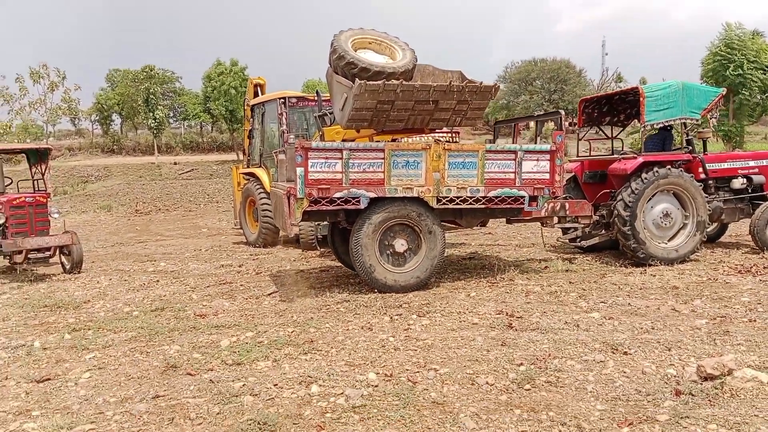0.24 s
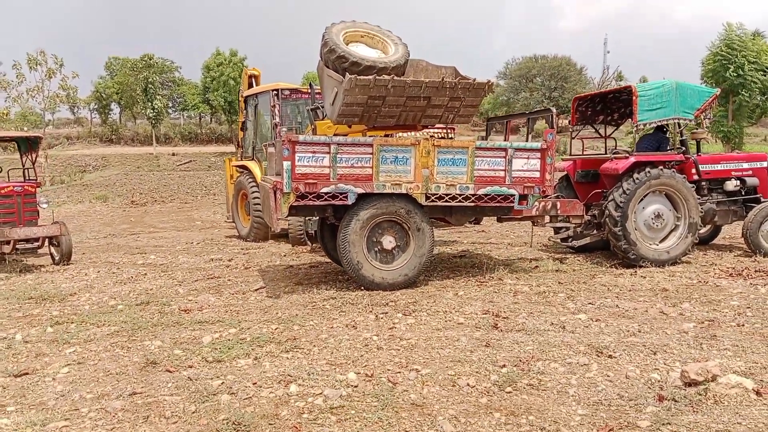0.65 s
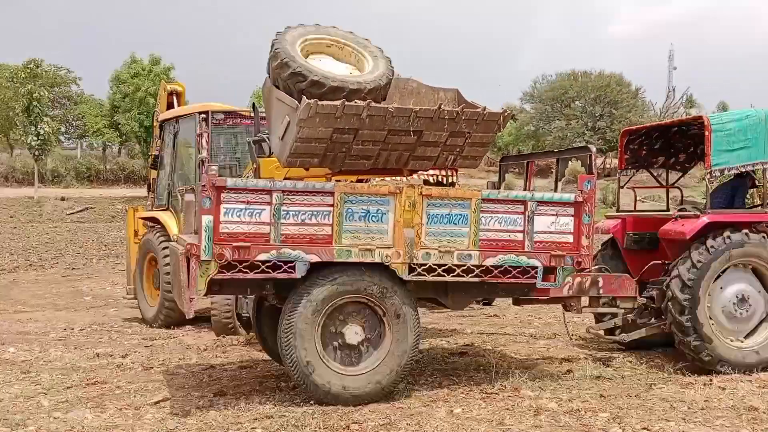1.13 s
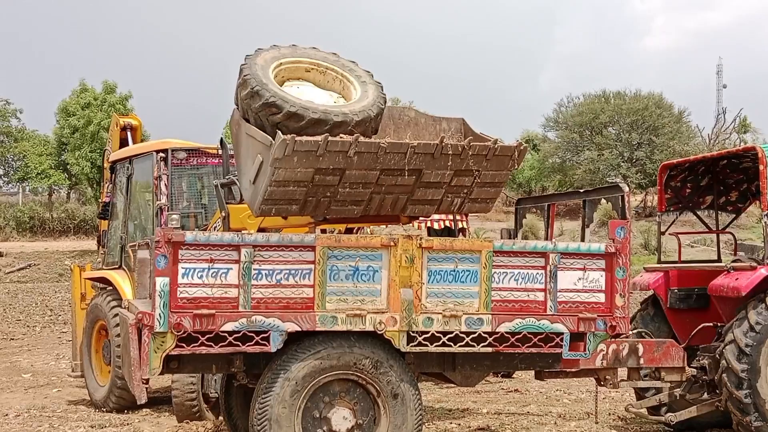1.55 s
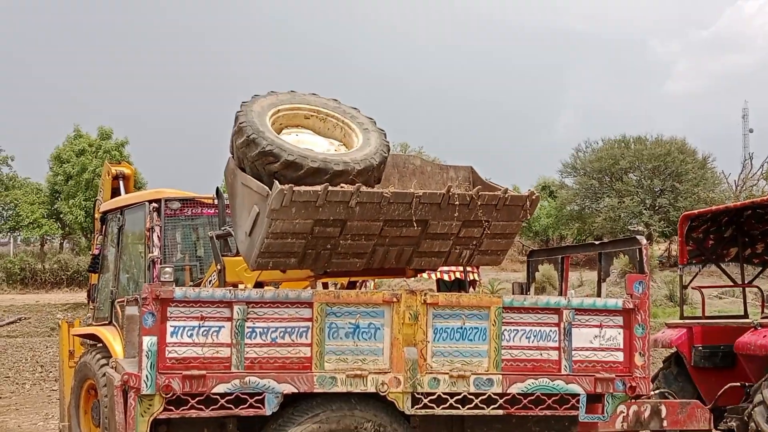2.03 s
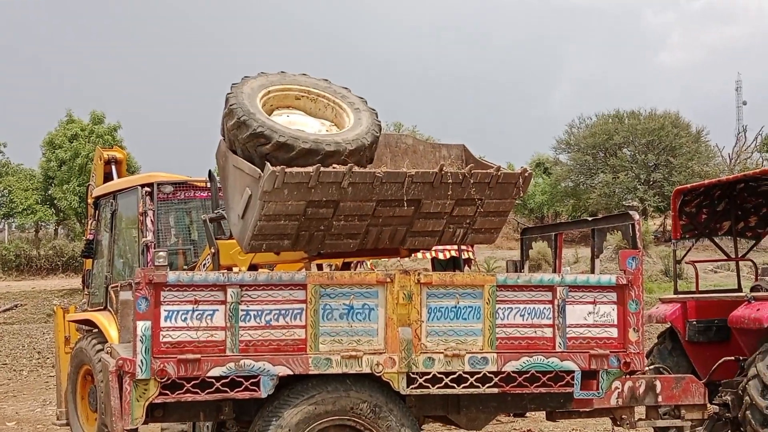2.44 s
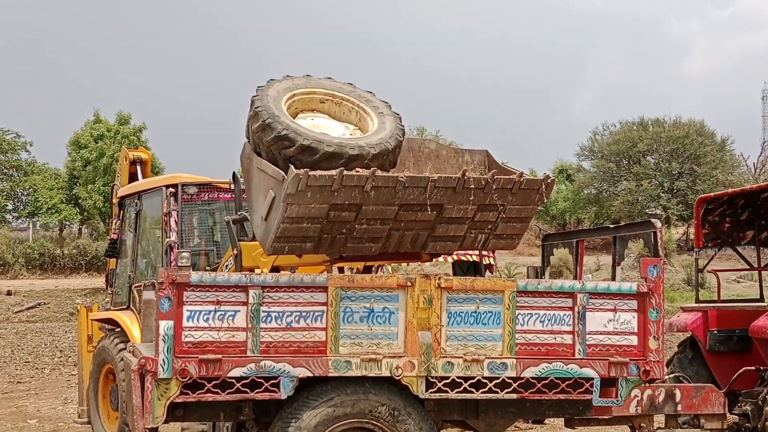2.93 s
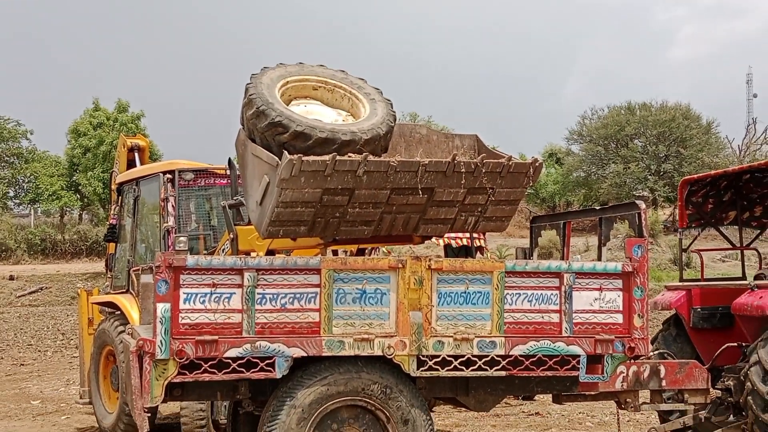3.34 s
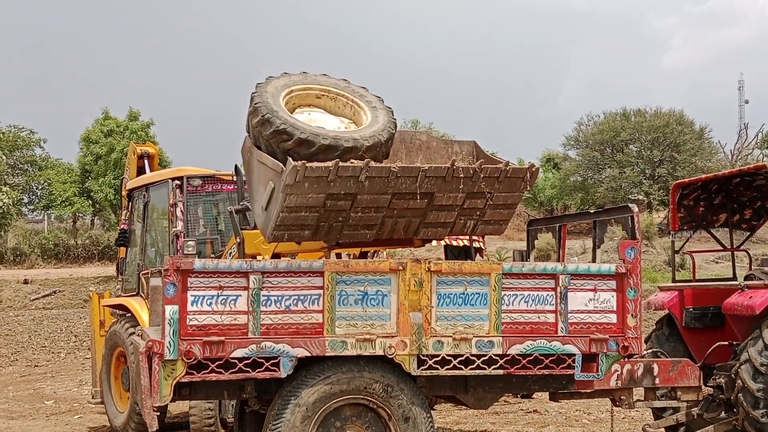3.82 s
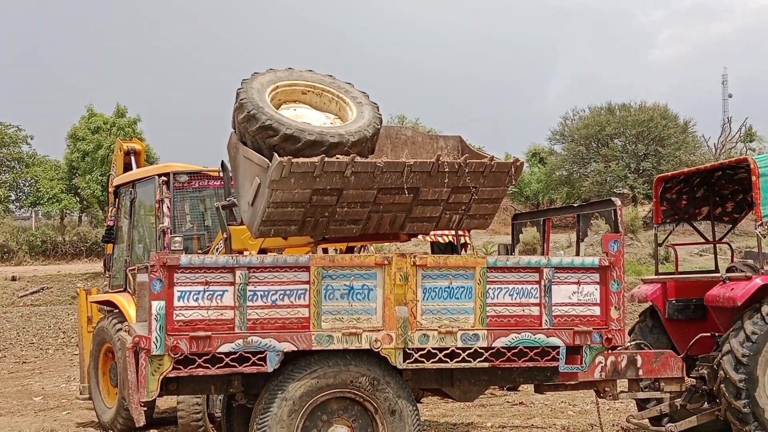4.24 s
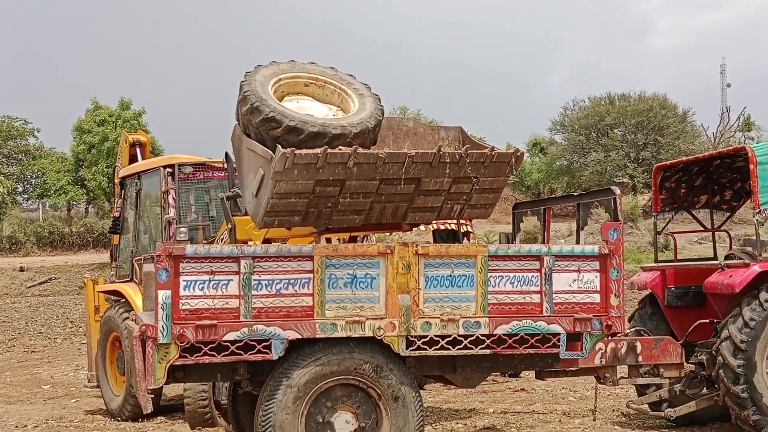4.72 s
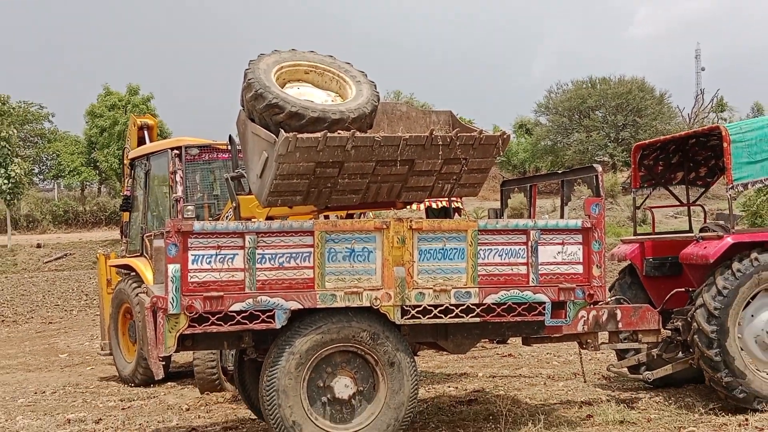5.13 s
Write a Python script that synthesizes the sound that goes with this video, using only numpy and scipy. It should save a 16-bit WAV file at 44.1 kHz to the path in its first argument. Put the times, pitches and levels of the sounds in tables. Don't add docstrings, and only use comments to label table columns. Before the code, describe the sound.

Outdoor phone pickup of a loader engine running at low revs, humming constantly with light knocking that grows fainter. Over it, near the microphone, clods crunch underfoot, dry stalks brush and crack around one second, a gritty double knock comes in the middle, and tiny crisp ticks follow. Small dry squeaks appear early, wind bumps softly, and the top treble is cut off.

```python
import sys
import numpy as np
from scipy import signal
from scipy.io import wavfile
from scipy.ndimage import uniform_filter1d

SR = 44100
rng = np.random.default_rng(int(sys.argv[2]) if len(sys.argv) > 2 else 0)


def undo_db(level):
    steps = np.asarray(level, float) / 20
    return 10 ** steps


def unload_audio(sound):
    columns = np.transpose(np.atleast_2d(sound))
    steps = np.round(np.clip(columns, -1, 1) * 32767)
    wavfile.write(sys.argv[1], SR, steps.astype(np.int16))


N = 237390
T = np.arange(N) / SR

# time in seconds, third order of the firing rate in Hz.
SPEED = [(0, 92.3), (1.55, 92.3), (1.62, 93.15), (2.8, 93.3), (4.25, 93.45), (4.35, 93.0), (4.93, 93.0),
         (4.99, 96.4), (5.2, 96.4), (5.25, 92.4), (5.38, 92.4)]
# time in seconds, level in dB.
HUM_LEVEL = [(0, -36.5), (.1, -42), (.7, -40.5), (.83, -39.5), (1.0, -41.5), (1.12, -39.5), (1.8, -43),
             (2.2, -42), (2.75, -40.5), (2.95, -41.5), (3.25, -39), (4.05, -40), (4.55, -42), (4.8, -50),
             (5.0, -40.5), (5.21, -40), (5.3, -47.5), (5.38, -50)]
# start in seconds, length in seconds, depth in dB.
LULLS = [(.375, 0.0089, 4), (.98, 0.012, 5.5), (1.42, 0.0074, 3), (1.53, 0.0089, 5), (1.67, 0.0099, 3.5),
         (2.19, 0.018, 4.5), (2.44, 0.011, 2.5), (2.9, .01, 6), (3.47, 0.0074, 3), (3.61, 0.012, 4),
         (3.72, 0.0061, 5.5), (4.13, 0.0082, 6.5), (4.23, 0.0036, 6.5), (4.38, 0.037, 4), (5.25, 0.01, 6)]
# multiple of the firing rate, level in dB against the third order.
SIDE_ORDERS = [(.5, -30), (1, -27), (1.5, -31.5), (2.5, -33), (3.5, -16), (4, -40), (4.5, -25), (5, -52.5),
               (5.5, -50), (6, -46)]
LULL_DB_PER_S, SECOND_ORDER_DB, SECOND_LULL_SHARE = 129.5, -11.5, 0.23

# time in seconds, level in dB.
CLATTER_LEVEL = [(0, -42), (.4, -47.5), (.79, -50), (.88, -46), (.97, -50), (1.1, -46.5), (1.29, -49),
                 (1.7, -52), (1.84, -53), (2.4, -55.5), (2.79, -43), (2.92, -59.5), (3.07, -54.5),
                 (3.5, -54.5), (3.82, -61), (4.53, -68.5), (5.14, -54), (5.38, -60.5)]
# frequency in Hz, width in Hz, level in dB.
BLOCK_MODES = [(803, 68, -7), (842.7, 70, -5), (910, 21.4, -5.5), (1024, 57, -8.5)]
# frequency in Hz, width in Hz, level in dB.
HEAD_MODES = [(1321, 46, -5), (1454.6, 55, 1.5), (1662, 84, -1), (1839, 80, -10)]
# frequency in Hz, width in Hz, level in dB.
COVER_MODES = [(2431, 27, 14), (2374, 120, 15), (2710, 77, -2), (3300, 86, -10), (3700, 170, -11)]
# frequency in Hz, width in Hz, level in dB.
PANEL_MODES = [(230, 51, -5), (319, 12, 6), (360, 30, 2)]
# frequency in Hz, width in Hz, level in dB.
DRUM_MODES = [(511.3, 9.3, 0)]
# start in seconds, length in seconds, extra level in dB.
BLOCK_SPELLS = [(.07, 0.097, 6), (.22, 0.09, 5), (.385, 0.036, 7.5), (.53, 0.029, 8), (.72, 0.09, 7),
                (1.0, 0.21, 6.5), (1.39, 0.15, 1.5), (1.7, 0.03, 4.5), (1.84, 0.056, 6), (1.97, 0.029, 1.5),
                (2.1, 0.032, 8), (2.21, 0.051, 5.5), (2.42, 0.02, 9.5), (2.6, 0.045, 1.5), (3.04, 0.16, 3),
                (3.29, 0.072, 5), (3.52, 0.038, 8), (3.66, 0.048, 8), (3.95, 0.13, 9.5), (4.13, 0.06, 8),
                (4.42, 0.021, 12.5), (4.5, 0.17, 16.5), (4.97, 0.06, 4), (5.27, 0.13, 5.5)]
# start in seconds, length in seconds, extra level in dB.
HEAD_SPELLS = [(.06, 0.087, 1.2), (.21, 0.048, 1.8), (.42, 0.16, 2.9), (.66, 0.12, 2.7), (.92, 0.31, 9.1),
               (1.26, 0.14, 5.7), (1.56, 0.087, 5.8), (1.77, 0.1, 4.8), (1.93, 0.25, 5.3),
               (2.2, 0.041, 7.4), (2.35, 0.097, 10.6), (2.57, 0.013, 3.9), (2.9, 0.076, 9.4),
               (3.05, .15, 3.7), (3.37, 0.12, 3.5), (3.5, 0.025, 7.4), (3.69, 0.036, 7.6), (3.8, 0.056, 10),
               (4.13, 0.079, 11), (4.28, 0.023, 15.3), (4.73, 0.053, 7.8), (4.88, 0.038, 5.2),
               (5.17, 0.21, 6.3)]
# start in seconds, length in seconds, extra level in dB.
COVER_SPELLS = [(0, 0.027, 5), (.3, 0.078, 0), (.53, 0.49, 3), (.95, 0.38, 12.5), (1.3, 0.33, 10),
                (1.72, 0.05, 7.5), (1.97, 0.18, 8), (2.22, .08, 6), (2.37, 0.064, 18.5), (2.55, .1, 17),
                (2.7, 0.2, 21.5), (3.14, .04, 11), (4.3, 0.035, 12.5), (5.0, 0.19, 19.5)]
# start in seconds, length in seconds, extra level in dB.
DRUM_SPELLS = [(.47, 0.035, 12), (.87, 0.017, 8.7), (1.12, 0.064, 16.6), (1.25, 0.041, 20.6),
               (1.52, 0.032, 17), (1.58, 0.046, 20), (1.71, 0.017, 13.6), (2.22, 0.023, 16.4),
               (2.76, 0.046, 6.3), (3.33, 0.066, 8), (4.62, 0.055, 6.3), (5.1, 0.013, 8.6)]
BLOCK_DB, HEAD_DB, DRUM_DB, SWELL_DB_PER_S = -5.5, -7, -72.5, 204
COVER_DB, COVER_FADE_DB_PER_S, BUZZ_DB_PER_S = -60.5, 5.5, 78
PANEL_DB, PANEL_FOLLOW = -67.5, 0.067

# frequency in Hz, level in dB per Hz.
FIZZ_SPECTRUM = [(4600, 0), (6200, -10.5), (7600, 0.5), (9300, -8), (10400, -4.5), (11800, -13.5),
                 (13000, -5.5), (15300, -14), (16000, -7.5)]
FIZZ_DB, FIZZ_PULSE = -86, 0.77
FIZZ_LAG = 0.091

# frequency in Hz, level in dB per Hz.
AIR_SPECTRUM = [(290, -29), (500, -9), (641, -44), (896, -0.5), (1200, -2), (1450, -10), (2030, -16.5),
                (2380, -20), (3480, -24.5), (4720, -38.5), (7750, -34.5), (9300, -60.5)]
AIR_DB = -62.5
ECHO_S, ECHO_SWAY, ECHO = .0046, .04, .45

# start in seconds, length in seconds, peak in dB.
GUSTS = [(0, .02, -41.5), (.235, 0.041, -46), (.43, 0.05, -51.5), (.59, 0.015, -48.5), (.69, 0.015, -47.5),
         (.8, 0.047, -50), (1.15, 0.061, -52), (1.32, 0.034, -52), (2.39, 0.1, -54.5), (2.72, 0.12, -54.5),
         (3.17, 0.13, -51.5), (3.655, 0.033, -49.5), (3.78, 0.089, -51.5), (3.99, 0.025, -48.5),
         (4.3, 0.034, -67.5), (4.86, 0.016, -66), (5.02, 0.014, -48.5), (5.14, 0.016, -41),
         (5.215, 0.012, -54.5)]
# frequency in Hz, level in dB per Hz.
RUMBLE_SPECTRUM = [(12, -42), (32, -34.5), (42, -2), (86, 6.5), (108, 1.5), (123, -12.5), (435, -16.5),
                   (700, -29), (910, -53)]
RUMBLE_DB, CALM_DB, GUST_RISE_DB_PER_S, GUST_FALL_DB_PER_S = -58, -61, 327.5, 254.5
PORT_HZ, PORT_HZ_PER_DB = 135, 1.96

# start in seconds, frequency in Hz,
# level in dB, length in seconds.
RINGS = [(.001, 212, -44.5, 0.043), (0.047, 2060, -66, 0.22), (0.224, 163, -33, 0.025),
         (0.212, 322, -45, 0.037), (.42, 146.7, -40.5, 0.037), (5.081, 320.8, -47, 0.054),
         (5.128, 258.4, -47.5, 0.04), (5.137, 411, -47, 0.027), (0.802, 1006, -26, 0.011),
         (0.802, 3020, -42, 0.018), (0.807, 2530, -43.5, 0.035), (0.821, 814, -39, 0.016),
         (0.833, 943, -42.5, 0.058), (0.84, 1450, -41, 0.012), (1.571, 3150, -59, .015),
         (1.573, 6560, -60, 0.058), (1.587, 7350, -66, 0.045), (1.604, 8200, -68, 0.047),
         (2.335, 3430, -53, 0.018), (2.367, 3320, -55, 0.019), (2.359, 6720, -60.5, 0.018),
         (2.413, 2493, -50, 0.03), (2.4, 5700, -76, 0.03), (2.413, 8850, -94, 0.031),
         (2.444, 665, -57, 0.025), (2.659, 1480, -30.5, 0.0076), (2.66, 6620, -42.5, 0.0095),
         (2.661, 3070, -37.5, 0.0093), (2.663, 933, -40, 0.03), (2.669, 2520, -39.5, 0.019),
         (2.715, 910, -39, 0.044), (2.703, 643, -42, 0.046), (2.77, 3320, -49.5, 0.018),
         (2.771, 4460, -67, 0.021), (2.784, 970, -46, 0.011), (2.775, 1385, -49.5, 0.054),
         (2.792, 717, -52, 0.057), (2.846, 6720, -67, 0.02), (3.318, 4040, -73, 0.019),
         (3.32, 8400, -77, .03), (3.342, 6700, -86, 0.081), (3.522, 3450, -67, 0.021),
         (5.081, 2200, -52.5, 0.021), (5.087, 1830, -47, 0.013), (5.083, 785, -49.5, 0.066),
         (5.108, 1156, -48.5, 0.041), (5.165, 9900, -81, 0.0098), (2.66, 4440, -62, 0.02),
         (2.711, 4650, -53, 0.012), (5.358, 4000, -80, .02)]
RING_WIDTH_HZ, RING_RISE_S = 20.7, 0.0073

# start in seconds, level in dB, then thud, grit and dust in dB against it.
CRUNCHES = [(.002, -43, -20, -37, -51), (0.214, -41.5, -9.5, -52, -67), (0.429, -43, -15, -25, -28),
            (0.776, -41, -18, -22, -32), (.804, -30.5, -8, -17, -13), (0.845, -45, -3, -28, -44),
            (2.332, -57, -27, 2.5, 1.5), (2.362, -54, -12, 1.5, -10), (2.452, -50.5, -14, -48, -36),
            (2.657, -40, -25, -5.5, -10.5), (2.709, -38, -5.5, -3, -4), (2.772, -46.5, -6, -8.5, -4),
            (2.826, -49.5, -11, -32, -22), (5.078, -50.5, -8, -9, -21), (5.114, -57, -3, -38, -60.5)]
HOLLOWS_HZ = [630, 910, 1130, 1480, 2510, 3000, 3350, 6650, 7700, 8600, 10100]
CRUNCH_T60_S = 0.23

# start in seconds, level in dB, frequency in Hz, length in seconds,
# upper ring in dB.
CHIRPS = [
    (0.039, -51.5, 3386, 0.034, -64.5),
    (0.425, -50.5, 3390, 0.032, -72),
    (0.864, -46, 3390, 0.026, -66),
]
CHIRP_RING_HZ = 5190
# time in seconds, frequency in Hz, level in dB, octave in dB.
SQUEAL = [(.12, 3665, -82, -100), (.168, 3680, -68, -100), (.188, 3685, -73, -95), (.208, 3645, -61, -90.5),
          (.24, 3685, -66, -78), (.295, 3605, -65, -74), (.345, 3610, -70, -82), (.362, 3610, -88, -102)]

# start in seconds, length in seconds, level in dB,
# share of the low treble from 0 to 1.
BRUSHES = [(0.345, 0.0053, -64, 0.8), (0.78, 0.037, -62, 0.64), (0.876, .04, -81, 0.8),
           (0.9, 0.017, -62.5, 0), (0.945, 0.19, -57.5, 0.6), (1.002, 0.089, -49.5, 0.35),
           (1.101, 0.065, -51, .4), (1.177, 0.055, -51, 0.5), (1.26, 0.032, -48.5, 0.43),
           (1.306, 0.017, -64, 0.4), (1.514, 0.032, -63.5, 1), (1.526, 0.065, -59.5, 0.08),
           (1.588, 0.029, -49.5, 0.15), (1.613, 0.041, -68, 0.3), (2.406, 0.013, -61, 0),
           (2.416, 0.036, -69.5, 0.7), (2.683, 0.14, -72, 0.84), (3.314, 0.092, -78.5, 0.7),
           (3.372, 0.033, -74, 0.5), (3.476, 0.0062, -55, 0.2), (3.503, 0.017, -53, 0.3),
           (4.14, 0.048, -77, 1), (4.218, 0.04, -67, 0.2), (4.263, 0.01, -45, 0.33),
           (5.076, 0.009, -70, 0.7), (5.1, 0.013, -70, 0.2), (5.25, 0.012, -75, 0.2),
           (5.294, 0.0086, -56, 0.24)]
# frequency in Hz, level in dB per Hz.
STALK_SPECTRUM = [(1590, -22.5), (2700, -5), (3870, 0.5), (4810, -28), (6300, -3.5), (8500, 3.5),
                  (10300, 1), (16200, -25)]
STILL_DB, STILL_FADE_DB_PER_S, STILL_SHARE = -82.5, 3, 0.93
BRUSH_RISE_DB_PER_S, BRUSH_FALL_DB_PER_S = 2600, 2397
BRUSH_SWELL_SHARE, BRUSH_TAIL_SHARE = 0.18, 0.35

# start in seconds, peak in dB, ring in Hz, knock in dB, knock in Hz.
SNAPS = [(1.036, -44, 11450, -70, 1870), (1.182, -21.5, 10330, -33, 2200), (1.1873, -16, 7730, -27, 2620),
         (1.1974, -39.5, 10500, -37, 2360), (1.2182, -40, 9900, -44.5, 2400),
         (1.2454, -26.5, 7030, -41, 2310), (1.2787, -36, 10000, -48, 2380), (1.292, -38, 7900, -53, 2430),
         (1.576, -41, 6940, -62, 3050), (2.406, -35.5, 12450, -57, 2330), (3.505, -37, 6030, -30.5, 4010),
         (3.5163, -37, 11940, -44, 3700), (4.248, -51, 13440, -44.5, 2280),
         (4.2617, -25, 12800, -25.5, 2100), (4.2644, -43, 7100, -36, 3660), (4.2705, -50, 8150, -45, 2180),
         (4.2737, -40, 12800, -49, 2300), (5.1, -29.5, 12200, -57, 2200)]
# start in seconds, peak in dB, ring in Hz.
TICKS = [(1.272, -45, 7530), (1.3142, -44, 11300), (1.3757, -56, 10100), (1.5258, -45, 8120),
         (1.5387, -47.5, 10100), (1.5616, -46, 10550), (1.8407, -51.5, 10230), (3.3808, -27, 10900),
         (3.4001, -66, 7060), (3.477, -32, 13500), (3.484, -34, 13100), (4.1426, -31.5, 8400),
         (4.16, -41, 7300), (4.1807, -43, 7640), (4.216, -41, 11900), (4.2294, -34, 13100),
         (4.2335, -33.5, 12300), (4.2914, -61, 13600), (4.1495, -61, 12900), (4.316, -58, 12900),
         (1.1854, -23, 12100), (1.2555, -47.5, 13500), (1.2778, -39, 13270), (1.2435, -35, 10800),
         (1.581, -39, 11170), (3.4465, -67, 12740), (3.4845, -41, 6500), (3.5055, -33.5, 10450),
         (3.5185, -41, 8500), (4.163, -54, 10800), (4.1775, -54, 11000), (4.206, -59, 13000),
         (4.243, -53, 13600), (4.286, -67, 12700), (5.082, -54, 10530), (5.158, -60, 9000),
         (5.168, -60, 12350), (5.27, -57, 14900), (5.293, -44.5, 12700), (5.252, -58, 11800),
         (5.299, -35.5, 5880), (5.309, -55, 13500)]
TICK_KNOCK_DB, TICK_KNOCK_HZ, SNAP_T60_S, STOUT_T60_S = -34, 2200, 0.0035, 0.0029


def evened(x):
    return x / np.sqrt(np.mean(x ** 2) + 1e-20)


def curves(rows, t=T):
    s, *columns = np.transpose(rows)
    return [np.interp(t, s, c) for c in columns]


def add(mix, s, sound):
    part = mix[round(s * SR):][:len(sound)]
    part += sound[:len(part)]


def band(x, lo_hz, hi_hz, order=3):
    edges = [lo_hz, min(hi_hz, SR / 2.1)]
    return signal.sosfilt(signal.butter(order, edges, "band", fs=SR, output="sos"), x)


def resonate(x, hz, width):
    b, a = signal.iirpeak(hz, hz / width, SR)
    return signal.lfilter(b, a, signal.lfilter(b, a, x))


def glide(x, hz, width):
    turn = np.exp(2j * np.pi * np.cumsum(hz) / SR)
    r = np.exp(-np.pi * width / SR)
    return (turn * signal.lfilter([1], np.convolve([1, -r], [1, -r]), x / turn)).real


def wander(seconds):
    size = max(round(seconds * SR), 1)
    return evened(uniform_filter1d(uniform_filter1d(rng.standard_normal(N), size), size))


def shaped(spectrum, patchy_db, size=512, streak_db=0.):
    frames, hz = 4 * N // size + 5, np.fft.rfftfreq(size, 1 / SR)
    a, b, patches, streaks = rng.standard_normal((frames, len(hz), 4)).T
    patches = evened(uniform_filter1d(uniform_filter1d(patches, size=8, axis=0), size=10, axis=1))
    streaks = evened(uniform_filter1d(uniform_filter1d(streaks, size=2, axis=0), size=14, axis=1))
    f, db = np.transpose(spectrum)
    colour_db = np.interp(np.log(hz + 1), np.log(f + 1), db, left=-100, right=-100)
    level_db = colour_db[:, None] + patchy_db * patches + streak_db * np.clip(streaks - 1, 0, 1.5)
    z = (a + 1j * b) * undo_db(level_db)
    return evened(signal.istft(z, nperseg=size, noverlap=3 * size // 4)[1][:N])


def spells(rows, rest_db, rise, fall):
    t = T[::16]
    s, length, db = np.transpose(rows)[:3, :, None]
    shapes = db - rise * np.maximum(s - t, 0) - fall * np.maximum(t - s - length, 0)
    shapes = np.vstack([shapes, (rest_db + 0 * T)[::16]])
    return np.interp(T, t, shapes.max(0)), np.repeat(shapes.argmax(0), 16)[:N]


def firings():
    return np.cumsum(curves(SPEED)[0]) / SR / 3


def exhaust(turns):
    lull_db = spells(LULLS, 0, LULL_DB_PER_S, LULL_DB_PER_S)[0]
    third_db = curves(HUM_LEVEL)[0] + 1 - lull_db
    second_db = third_db + SECOND_ORDER_DB + (1 - SECOND_LULL_SHARE) * lull_db
    flutter, sway = wander(.012), wander(.06)
    hum = undo_db(third_db + 1.1 * flutter + .7 * sway) * np.cos(2 * np.pi * 3 * turns + .22 * sway)
    hum += undo_db(second_db + 1.1 * flutter + 1.1 * sway) * np.cos(2 * np.pi * 2 * turns + 1 + .15 * sway)
    for order, db in SIDE_ORDERS:
        level = undo_db(third_db + db + 0.28 * wander(0.11))
        hum += level * np.cos(2 * np.pi * order * turns + wander(0.59))
    return np.sqrt(2) * hum


def knocks(turns):
    chance_db = 2.0 * np.clip(rng.standard_normal(400), -2, 2)
    cylinder_db = chance_db[turns.astype(int)] - 3.0 * (turns // 1 % 2)
    puff = undo_db(cylinder_db) * 1.1 * np.exp(-(turns % 1) / .3)
    return (.8 + puff) * rng.standard_normal(N)


def clatter(turns):
    knock = knocks(turns)
    base_db = curves(CLATTER_LEVEL)[0]
    block_db = base_db + BLOCK_DB + spells(BLOCK_SPELLS, 0, SWELL_DB_PER_S, SWELL_DB_PER_S)[0]
    head_db = base_db + HEAD_DB + spells(HEAD_SPELLS, 0, SWELL_DB_PER_S, SWELL_DB_PER_S)[0]
    buzz_db = spells(COVER_SPELLS, 0, BUZZ_DB_PER_S, BUZZ_DB_PER_S)[0]
    cover_db = COVER_DB - COVER_FADE_DB_PER_S * T + buzz_db
    panel_db = PANEL_DB + PANEL_FOLLOW * (base_db - base_db.mean())
    drum_db = DRUM_DB + spells(DRUM_SPELLS, 0, 4 * SWELL_DB_PER_S, 4 * SWELL_DB_PER_S)[0]
    parts = ((BLOCK_MODES, block_db), (HEAD_MODES, head_db), (COVER_MODES, cover_db),
             (PANEL_MODES, panel_db), (DRUM_MODES, drum_db))
    out = np.zeros(N)
    for modes, level_db in parts:
        ring = np.zeros(N)
        for k, (hz, width, db) in enumerate(modes):
            waver = 1 + .01 * wander(.09)
            fade_db = 1.5 * np.clip(wander(0.06), -2, 1.6)
            sign = (-1) ** k
            ring += sign * undo_db(db + fade_db) * evened(glide(knock, hz * waver, 1.92 * width))
        out += undo_db(level_db) * evened(ring)
    return out


def fizz(turns):
    since = (turns - FIZZ_LAG) % 1
    pulse = evened(since * np.exp(-since / 0.072)) * undo_db(2.0 * wander(.03))
    hiss = shaped(FIZZ_SPECTRUM, patchy_db=2.5, size=256, streak_db=7)
    return undo_db(FIZZ_DB) * evened(hiss * (1 + FIZZ_PULSE * pulse))


def field_air(turns):
    throb = 1 + 0.072 * np.cos(2 * np.pi * (turns - 2 * FIZZ_LAG))
    return undo_db(AIR_DB + 2.5) * shaped(AIR_SPECTRUM, patchy_db=2.5, streak_db=9.5) * throb


def ground(x):
    lag = ECHO_S * (1 + ECHO_SWAY * wander(.15)) * SR
    echo = np.interp(np.arange(N) - lag, np.arange(N), x)
    return (x + ECHO * echo) / np.sqrt(1 + ECHO ** 2)


def suppress(x, over_db, depth_db):
    z = signal.stft(x, nperseg=1024, noverlap=768)[2]
    power = uniform_filter1d(uniform_filter1d(abs(z) ** 2, size=5, axis=-1), size=3, axis=-2)
    level_db = 10 * np.log10(power + 1e-20)
    usual_db = uniform_filter1d(level_db, size=60, axis=-1)
    shut = np.clip(.5 - (level_db - usual_db) / over_db, 0, 1)
    return signal.istft(z * undo_db(-depth_db * shut), nperseg=1024, noverlap=768)[1][..., :N]


def wind():
    rest_db = CALM_DB + 2.0 * wander(0.009)
    level_db = spells(GUSTS, rest_db, GUST_RISE_DB_PER_S, GUST_FALL_DB_PER_S)[0]
    hz = PORT_HZ + PORT_HZ_PER_DB * np.maximum(level_db - CALM_DB - 7.0, 0)
    turn = np.exp(2j * np.pi * np.cumsum(hz) / SR)
    a, b = signal.sosfilt(signal.butter(2, 45, fs=SR, output="sos"), rng.standard_normal((2, N)))
    thumps = evened(((a + 1j * b) * turn).real)
    return undo_db(level_db) * thumps + undo_db(RUMBLE_DB) * shaped(RUMBLE_SPECTRUM, patchy_db=1.0, size=2048)


def rings():
    out, t = np.zeros(N), T[:SR // 4]
    slow = signal.butter(4, 140, fs=SR, output="sos")
    for s, hz, db, length in RINGS:
        drift, flutter = signal.sosfilt(slow, rng.standard_normal((2, len(t))))
        wavering_hz = hz + (RING_WIDTH_HZ + 0.016 * hz) * evened(drift)
        tone = np.sqrt(2) * np.sin(2 * np.pi * np.cumsum(wavering_hz) / SR)
        level_db = db + 3.42 * evened(flutter) - 5.9 * (t / length) ** 2
        rise = np.minimum(t / (RING_RISE_S + 2 / hz), 1)
        add(out, s, tone * undo_db(level_db) * rise)
    return out


def crunches():
    out, t = np.zeros(N), T[:SR // 4]
    for s, mid_db, *others_db in CRUNCHES:
        low_db, presence_db, treble_db = mid_db + np.array(others_db)
        # level in dB, low edge in Hz, high edge in Hz, speed of decay, rise in seconds.
        bands = ((low_db, 190, 760, .7, .012),
                 (mid_db, 750, 1900, 1, .004),
                 (presence_db, 2000, 4000, 1.2, .003),
                 (treble_db, 5800, 9000, 1.6, .005),
                 (treble_db - 8.5, 9600, 12000, 2.3, .005),
                 (treble_db - 18, 12000, 15400, 3.2, .005))
        for db, lo, hi, quick, rise in bands:
            noise, grit = rng.standard_normal((2, len(t)))
            hollows = sum(evened(resonate(noise, hz, 60 + 0.03 * hz)) for hz in HOLLOWS_HZ if lo < hz < hi)
            sound = evened(0.9 * hollows + evened(band(noise, lo, hi, order=4)))
            sound = sound * undo_db(2.0 * evened(uniform_filter1d(grit, size=200)))
            decay_db = -60 * t * quick / CRUNCH_T60_S
            add(out, s, sound * undo_db(db + decay_db) * np.minimum(t / rise, 1))
    return out


def linkage():
    out = np.zeros(N)
    for s, db, hz, length, ring_db in CHIRPS:
        t = T[:round(2 * length * SR)]
        shake = 1 + 0.66 * np.cos(2 * np.pi * 65 * t)
        chirp = undo_db(db - 21 * (t / length) ** 2) * np.sin(2 * np.pi * hz * t)
        ring = undo_db(ring_db - 9 * t / length) * np.sin(2 * np.pi * CHIRP_RING_HZ * t) * shake
        add(out, s, (chirp + ring) * signal.windows.tukey(len(t), .12))
    hz, db, octave_db = curves(SQUEAL)
    turn = 2 * np.pi * np.cumsum(hz + 10 * wander(0.013)) / SR
    on = uniform_filter1d(1. * (T > SQUEAL[0][0]) * (T < SQUEAL[-1][0]), size=600)
    squeal = undo_db(db) * np.sin(turn) + undo_db(octave_db) * np.sin(2 * turn)
    return out + on * np.sqrt(2) * undo_db(2.5 * wander(.008)) * squeal


def rustle():
    cracks = undo_db(1.9 * rng.exponential(1, N)) * (rng.random(N) < 500 / SR)
    grain = signal.lfilter([1], [1, -.96], cracks)
    hiss = evened(shaped(STALK_SPECTRUM, patchy_db=3.0, streak_db=8) * (1 + .45 * evened(grain)))
    length = np.array(BRUSHES)[:, 1:2]
    rise = 1 / (1 / BRUSH_RISE_DB_PER_S + BRUSH_SWELL_SHARE * length / 30)
    fall = 1 / (1 / BRUSH_FALL_DB_PER_S + BRUSH_TAIL_SHARE * length / 30)
    level_db, row = spells(BRUSHES, STILL_DB - STILL_FADE_DB_PER_S * T, rise, fall)
    shares = np.array([r[3] for r in BRUSHES] + [STILL_SHARE])
    share = np.clip(uniform_filter1d(shares[row], size=1300), 0, 1)
    dull = band(hiss, 2570, 10500, order=2)
    crisp = band(hiss, 8700, 22000, order=2)
    return undo_db(level_db) * np.sqrt(2) * (np.sqrt(share) * dull + np.sqrt(1 - share) * crisp)


def snaps():
    out, t = np.zeros(N), T[:1000]
    rise = np.minimum(t / 0.0003, 1)
    ticks = [(*r, r[1] + TICK_KNOCK_DB, TICK_KNOCK_HZ) for r in TICKS]
    for s, peak_db, hz, knock_db, knock_hz in SNAPS + ticks:
        t60 = SNAP_T60_S + STOUT_T60_S * np.clip(0.5 + (knock_db - peak_db) / 4, 0, 1)
        fall_db = -60 * t / np.clip(t60, .002, .014)
        noise = rng.standard_normal(len(t))
        bright = .7 * evened(band(noise, 6200, 15500)) + np.sin(2 * np.pi * hz * t + .7 * noise)
        tick = band(undo_db(peak_db + 2 + fall_db) * bright * rise, .7 * hz, min(1.4 * hz, 16300))
        tick += undo_db(peak_db - 24 + fall_db) * evened(band(noise, 5200, 15500)) * rise
        knock = np.sin(2 * np.pi * knock_hz * t) + 0.41 * evened(band(noise, 1300, 5000))
        add(out, s - .0004, tick + undo_db(knock_db + 0.5 + 0.38 * fall_db) * knock * rise)
    return out


def scene():
    turns = firings()
    steady = clatter(turns) + field_air(turns)
    engine = exhaust(turns) + fizz(turns) + linkage()
    near = wind() + rings() + crunches() + rustle() + snaps()
    return (engine + near + suppress(ground(steady), over_db=8, depth_db=4))[None]


def low_pass(x):
    return signal.sosfilt(signal.butter(12, 16500, fs=SR, output="sos"), x)


def record(dry):
    notched = signal.lfilter(*signal.iirnotch(4850, 4.5, SR), dry)
    notched = 0.59 * signal.lfilter(*signal.iirnotch(9350, 12.0, SR), notched) + 0.42 * notched
    heard = signal.sosfilt(signal.cheby1(10, .5, 15480, fs=SR, output="sos"), notched)
    heard = heard + undo_db(-16.5) * band(notched, 15700, 16500)
    return low_pass(heard)


dry = scene()
out = record(dry)
unload_audio(out)
```